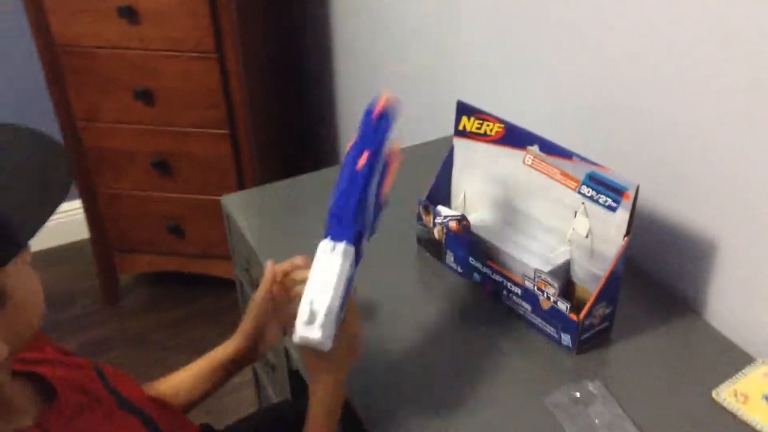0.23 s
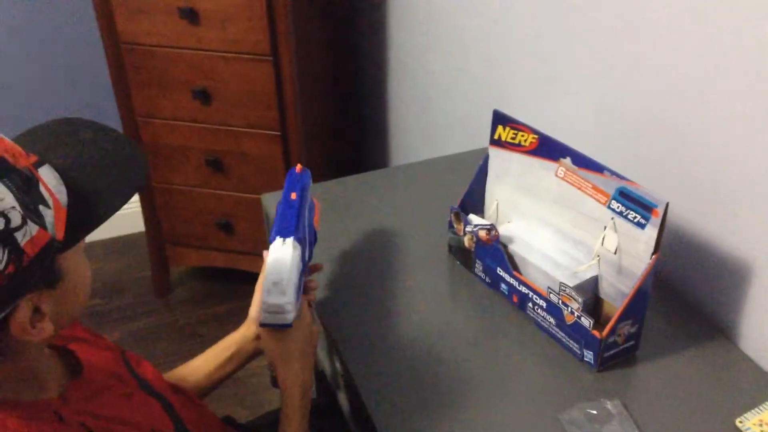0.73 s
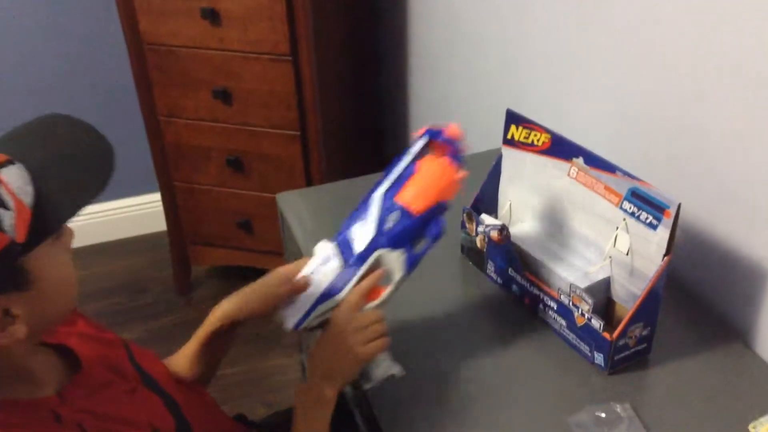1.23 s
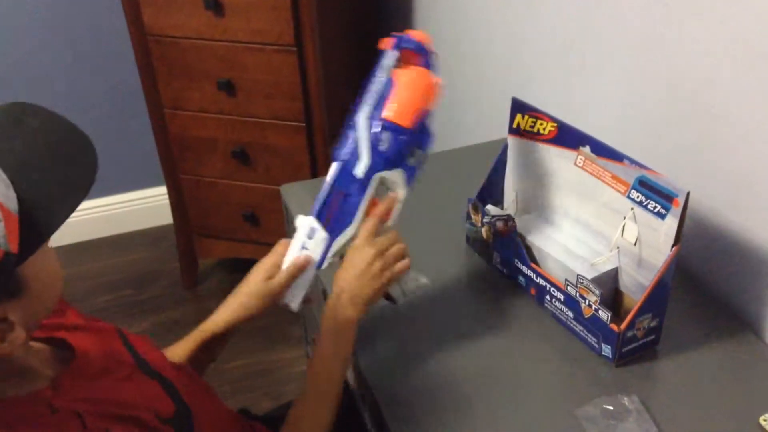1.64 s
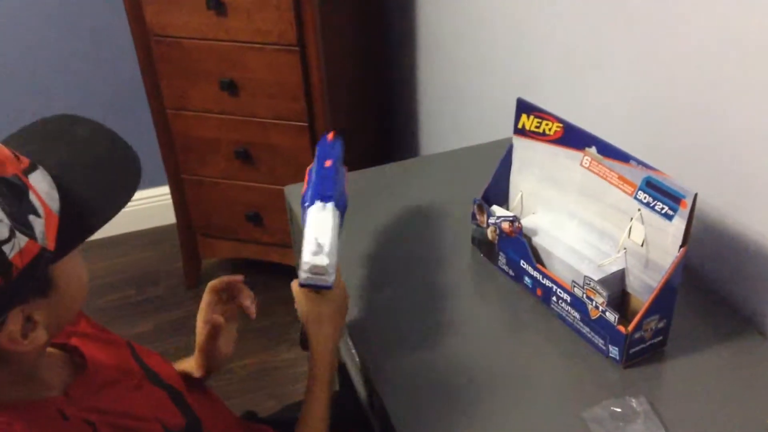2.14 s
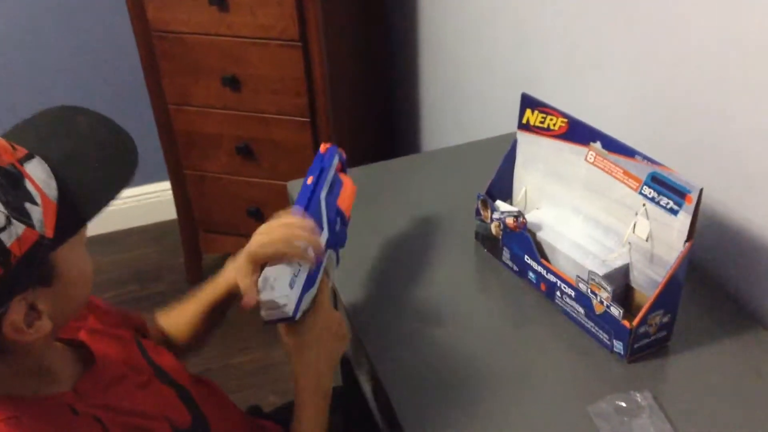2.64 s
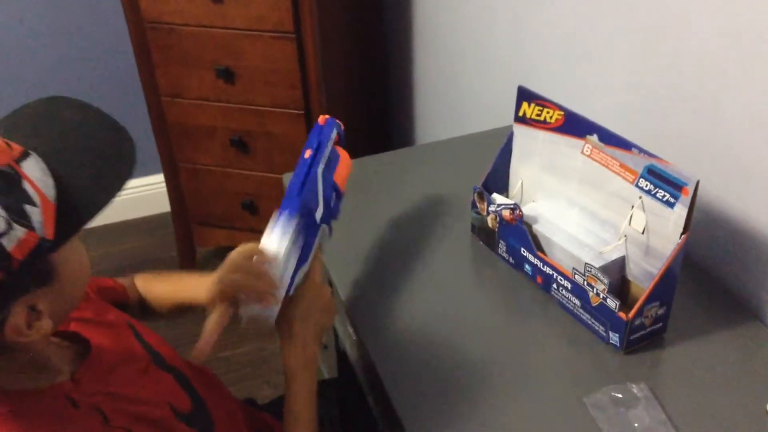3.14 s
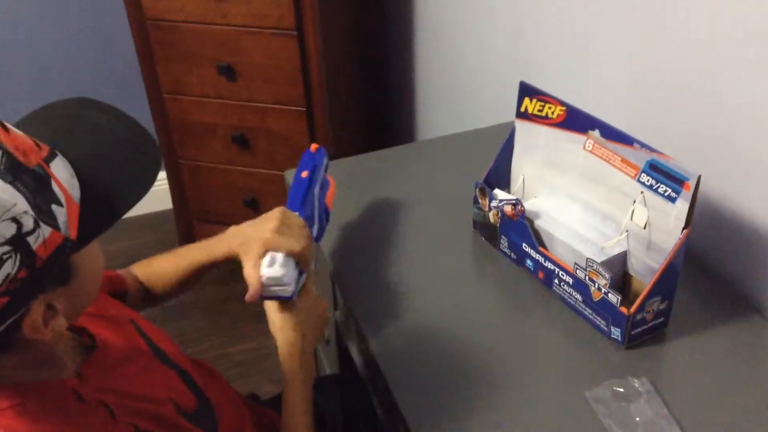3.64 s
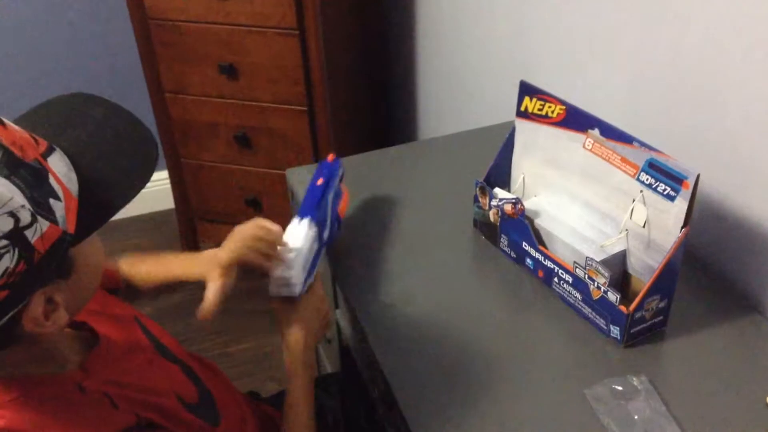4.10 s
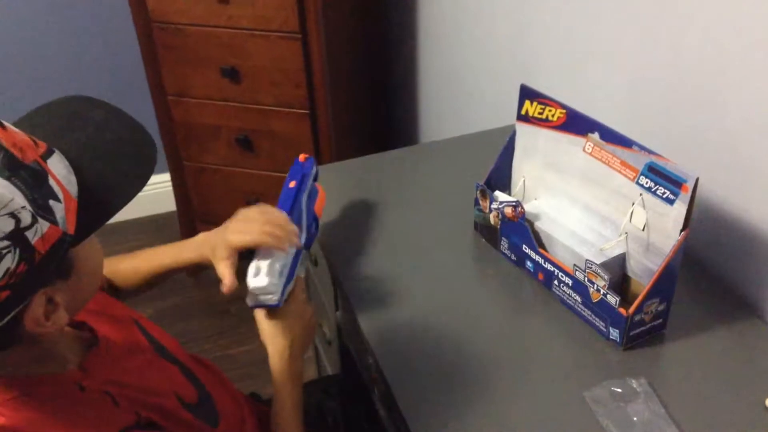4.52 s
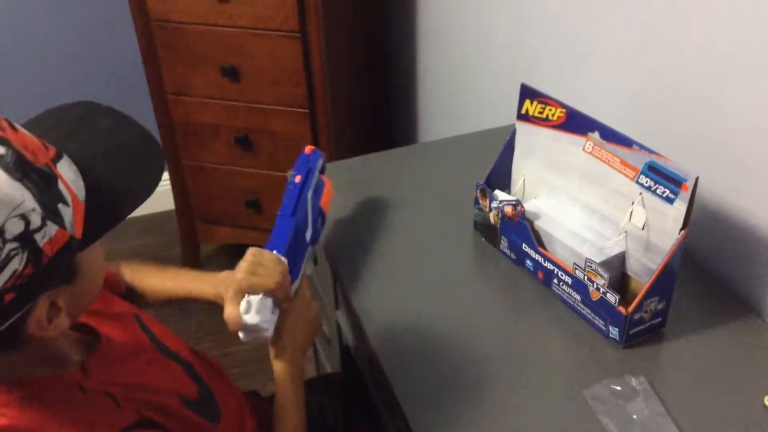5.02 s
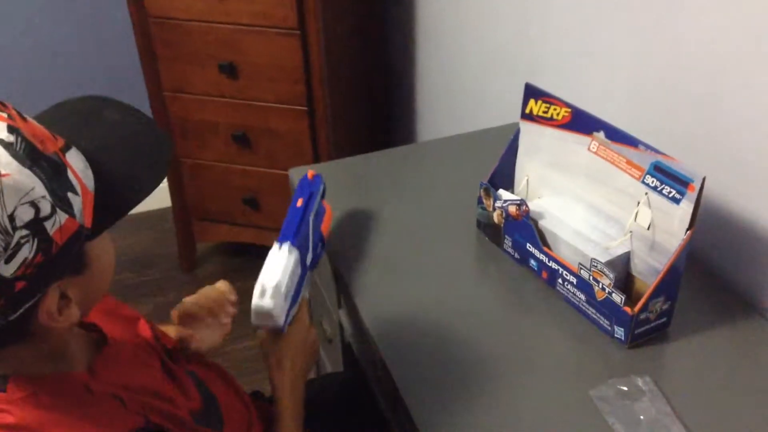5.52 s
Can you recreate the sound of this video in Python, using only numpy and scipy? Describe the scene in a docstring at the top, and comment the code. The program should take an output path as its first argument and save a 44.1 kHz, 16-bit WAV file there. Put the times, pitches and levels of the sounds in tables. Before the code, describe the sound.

A hollow plastic toy dart blaster is worked close to the microphone in a small, hard-walled room with a short echo and faint hum. It opens with quick clicks and the slide slamming home at 0.2 seconds. The first shot pops at 0.6, the dart smacking a farther surface an instant later. The slide scrapes back and latches at 1.5, slams forward at 1.8, and a second shot comes at 2.2, its dart bouncing lightly. The cycle then quickens: latch at 2.9, slam at 3.2, shot at 3.4; latch at 3.8, slam at 4.1, shot at 4.3 with a clattering dart. A loud latch and knock at 4.9 and a slam at 5.2 lead to the last shot at 5.4, followed by a sharp click. Throughout, small parts click and rattle, and hands softly brush and knock the shell.

```python
"""Toy dart blaster in a room

A spring-powered blaster is primed and fired five times in a small, hard-walled room. Its slide scrapes
back, latches and slams home; the freed plunger strikes with a pop, the spring shudders, and the dart
smacks a far surface. Hands brush, knock and rattle the hollow plastic shell. Each impact is a brief
noisy force filtered by resonances, and the room prolongs it with reflections and standing waves."""
import sys
import numpy as np
from scipy import signal
from scipy.fft import rfft, irfft
from scipy.io import wavfile
from scipy.ndimage import uniform_filter1d

SR = 44100
rng = np.random.default_rng(int(sys.argv[2]) if len(sys.argv) > 2 else 0)


def file_out(sig):
    """Save sig as 16-bit WAV at sys.argv[1]."""
    # one column per channel
    cols = np.atleast_2d(sig).T
    # limit, then scale
    lim = np.clip(cols, -1, 1)
    pcm = np.round(lim * 32767).astype(np.int16)
    wavfile.write(sys.argv[1], SR, pcm)


N = 254016

# Levels are relative within each table. Hardness is a treble lift; ring is the note of the part struck.
# spectrum of the room air: (frequency [Hz], level [dB])
AIR_SPECTRUM = [(50, -49), (110, -1.5), (180, -23), (240, -4.5), (330, -13.5), (480, -10), (800, -11.5),
                (2000, -18), (5700, -26.5), (9000, -30.5), (15000, -37)]
# steady tones in the room: (frequency [Hz], level [dB])
HUM_TONES = [(242.2, -62.5), (543.7, -67)]
# reverberation time: (frequency [Hz], time to fall 60 dB [s])
ROOM_T60 = [(100, 0.24), (170, 0.3), (400, 0.41), (1040, 0.43), (2760, .47), (7000, 0.4), (10000, 0.35),
            (14500, 0.29)]
# standing waves of the room: (frequency [Hz], level [dB])
STANDING_WAVES = [(147, -50.5), (265, -44), (343, -31), (368, -53), (503, -44.5), (590, -50), (661, -50),
                  (811, -26), (921, -31), (979, -40), (1022, -51), (1245, -55), (1372, -66), (1452, -41),
                  (1656, -48)]
# echoes from wall and ceiling: (delay [s], added strength [ratio])
WALL_ECHOES = [(.0095, 0.073), (0.0232, 0.21)]
# resonances of the hollow shell: (frequency [Hz], bandwidth [Hz], level [dB])
SHELL_MODES = [(466, 147, -0.5), (680, 130, -8.5), (1039.5, 30, -8.5), (1236, 24, -12), (2203, 320, -10.5),
               (3750, 47, -21), (4460, 510, -18), (6230, 240, -10)]
# spectral envelope of each kind of contact: (frequency [Hz], level [dB])
PALM_SPECTRUM = [(300, -30), (1500, -12), (3500, 1), (6200, 4), (10000, -5), (15500, -6)]
RUB_SPECTRUM = [(88, -52), (150, -25), (422, -13), (624, -3), (821, -3), (1080, 1.5), (1360, -3),
                (2060, -4), (10200, -14.5), (14800, -24), (16000, -44)]
KNOCK_SPECTRUM = [(53, -40), (90, -17), (633, -13), (1510, -14.5), (2000, -20), (3010, -17), (8170, -20.5),
                  (13700, -28), (15000, -42), (16000, -44)]
CLICK_SPECTRUM = [(71, -71), (120, -21.5), (209, -24), (231, -11), (295, -35.5), (473, -15), (670, -4.5),
                  (856, -12), (1050, -5), (1340, -6), (3520, -11.5), (4680, -10), (13600, -17),
                  (15000, -18.5), (16000, -41)]
SLAM_SPECTRUM = [(71, -33), (120, -32), (177, -19.5), (295, -1.5), (393, 0.5), (727, 0.5), (805, -6.5),
                 (1010, 4), (1650, -5), (2150, -3), (3590, -10), (9790, -12), (13900, -15), (15000, -11),
                 (16000, -44)]
DART_SPECTRUM = [(53, -14), (90, -21.5), (249, 8), (410, -5.5), (647, 0.5), (1040, 0.5), (1240, 3),
                 (2710, -7.5), (9310, -18), (15000, -24), (16000, -9.5)]
PLUNGER_SPECTRUM = [(80, -23.5), (125, 7.5), (180, 10.5), (300, 5), (420, -1), (620, 7.5), (880, -0.5),
                    (1350, 6), (2100, 2), (3100, 0.5), (4700, 0), (10000, -1), (15500, -4.5)]
# a palm brushing smooth plastic: (start [s], end [s], level [dB])
PALM_STROKES = [(0.33, 0.46, -52.5), (1.124, 1.173, -62), (1.367, 1.458, -48), (2.483, 2.63, -59),
                (3.63, 3.733, -52.5), (4.27, 4.34, -63), (4.638, 4.718, -54)]
# slide drawn back: (start [s], latch time [s], rubbing level [dB], latch level [dB], hardness [dB])
SLIDE_PULLS = [(1.39, 1.54, -34.5, 2, 9.5), (2.771, 2.945, -27, 5.5, 14), (3.71, 3.844, -25, 0.5, 9),
               (4.727, 4.869, -31, 0, 10)]
# slide running home: (slam time [s], rubbing level [dB], slam level [dB], hardness [dB], ring [Hz])
SLIDE_RETURNS = [(0.166, -22, -3.5, -0.5, 501), (1.822, -19, -3.5, 2, 545), (3.199, -28, -1, 3, 409),
                 (4.097, -24.5, -1.5, 1, 552), (5.171, -22.5, -0.5, 1.5, 538)]
# impacts, by the part that strikes: (time [s], level [dB], hardness [dB], ring [Hz])
HAND_KNOCKS = [(1.073, -22.5, -11.5, 665), (1.154, -13.5, -14.5, 410), (2.708, -29.5, -24, 530),
               (4.548, -16, -8, 278), (4.609, -26, -1, 264), (4.892, -8.5, 0, 496), (5.705, -29, -14, 513)]
MECHANISM_CLICKS = [(0.002, -15.5, -6.5, 1710), (0.022, -24, 0, 1810), (0.152, -12.5, -1, 1090),
                    (0.257, -9.5, -3, 670), (0.548, -26.5, -5.5, 720), (0.844, -23, 13, 786),
                    (1.101, -25, -9, 953), (1.206, -19.5, -2, 2650), (1.315, -23, -12, 2310),
                    (1.371, -23, -4, 2100), (1.426, -16, -3, 680), (1.467, -4, 5, 2530),
                    (1.513, -9, 1, 1440), (1.665, -8.5, 3.5, 1850), (1.803, -6.5, -2, 1250),
                    (1.901, -8, -7, 678), (2.754, -18, -10, 815), (2.774, -7.5, 16.5, 3420),
                    (2.858, -13.5, 0, 730), (2.931, -11.5, -6, 580), (3.076, -9.5, 1, 1570),
                    (3.132, -16, -1, 1000), (3.717, -6, 4, 1080), (3.808, -3, 4.5, 1130),
                    (3.986, -10, -1, 1550), (4.466, -5, 14, 1220), (4.71, -12.5, 5, 760),
                    (4.799, -14, -2.5, 680), (4.886, 2.5, -3.5, 670), (5.046, -10, 0, 1490),
                    (5.457, 4, -3, 1380)]
ROD_CLACKS = [(0.078, -15, -10, 1900), (0.121, -10, 0, 1410), (0.133, -11, 1, 1350), (1.756, -3.5, 3, 1580),
              (1.778, -4.5, 12, 1240)]
DART_IMPACTS = [(0.658, 4, 7, 484), (2.29, 2.5, 3, 640), (2.4, -17.5, -10, 1240), (2.503, -18, 4, 1230),
                (3.456, 5.5, 4, 540), (4.389, 0, -4, 520), (4.403, 2.5, 8, 1240), (4.479, -4, 13, 1190),
                (5.445, -1.5, -10, 1320)]
PLUNGER_STRIKES = [(0.606, 1.5, 1, 645), (2.239, 2, -1.5, 520), (3.407, 1.5, 0, 684), (4.34, 1, 1, 566),
                   (5.383, 2.5, -0.5, 1440)]

TAPS = 8192
HZ = np.fft.rfftfreq(TAPS, 1 / SR)  # frequency grid of the filters


def gain_of(db):
    """Amplitude ratio: a factor of ten for every 20 dB."""
    return 10 ** (np.asarray(db) / 20)


def unit_rms(x):
    """Normalisation to unit mean power."""
    return x / np.sqrt(np.mean(x ** 2) + 1e-20)


def curve_at(points, hz):
    """Interpolation of a (frequency, value) table on a logarithmic frequency axis."""
    f, value = np.transpose(points)
    return np.interp(np.log(hz + 1), np.log(f + 1), value)


def add(mix, s, sound):
    """Superposition: a sound adds to the mix from time s onward."""
    part = mix[max(round(s * SR), 0):][:len(sound)]
    part += sound[:len(part)]


def coloured(x, db):
    """Causality: a minimum-phase filter, shaped by db over HZ, rings only after it is struck."""
    log_gain = np.log(gain_of(np.maximum(db - db.max(), -100)))
    mirrored = np.concatenate([log_gain, log_gain[-2:0:-1]])
    response = irfft(np.exp(np.conj(signal.hilbert(mirrored)))[:len(HZ)])
    return signal.fftconvolve(x, response[:TAPS // 2])


def placed(sound, direct_db, room_db):
    """Two-path propagation: one row travels straight, the other feeds the room."""
    return sound * gain_of([[direct_db], [room_db]])


def background(air_db, hum_db):
    """Stationary noise: the continuous spectrum of room air plus the line spectrum of a low hum."""
    t = np.arange(N) / SR
    air = unit_rms(coloured(rng.standard_normal(N), curve_at(AIR_SPECTRUM, HZ))[:N])
    hum = sum(gain_of(db) * np.sqrt(2) * np.sin(2 * np.pi * (hz * t + rng.random()))
              for hz, db in HUM_TONES)
    return gain_of(air_db) * air + gain_of(hum_db) * hum


def room_response(gap_s=0.0012, build_s=0.0066, modes_db=-19.5, early_lift=0.32, early_s=0.0081):
    """Reverberation: reflections thicken and decay band by band; standing waves ring among them."""
    t = np.arange(SR) / SR
    density = np.minimum(1500 + 120000 * t, 9000)  # reflections per second
    arrivals = rng.standard_normal(SR) * (rng.random(SR) < density / SR) / np.sqrt(density)
    band_hz, frame_s, bands = signal.stft(arrivals, SR, nperseg=256)
    decay = gain_of(-60 * frame_s / curve_at(ROOM_T60, band_hz)[:, None])
    tail = signal.istft(bands * decay, SR, nperseg=256)[1][:SR]
    waves = sum(gain_of(db - 60 * t / curve_at(ROOM_T60, hz))
                * np.sin(2 * np.pi * (hz * t + rng.random())) for hz, db in STANDING_WAVES)
    onset = np.clip((t - gap_s) / build_s, 0, 1)
    early = 1 + early_lift * np.exp(-t / early_s)  # table and wall are close
    early += sum(strength * np.exp(-((t - delay) / 0.0007) ** 2) for delay, strength in WALL_ECHOES)
    return (unit_rms(tail * onset * early) + gain_of(modes_db) * unit_rms(waves * onset)) / np.sqrt(SR)


def reflections(x, level_db):
    """Convolution with a room response that shifts each second as the blaster is moved about."""
    t, out = np.arange(N) / SR, np.zeros(N)
    for second in range(7):
        crossfade = np.cos(np.pi / 2 * np.clip(t - second, -1, 1))
        out += signal.oaconvolve(x * crossfade, room_response())[:N]
    return gain_of(level_db) * out


def palm_hiss():
    """Friction noise: skin hisses softly on plastic as the hand shifts its grip."""
    out = np.zeros(N)
    for start, end, db in PALM_STROKES:
        pressure = signal.windows.tukey(max(round((end - start) * SR), 2), .6)
        hiss = coloured(rng.standard_normal(len(pressure)), curve_at(PALM_SPECTRUM, HZ))
        add(out, start, gain_of(db) * pressure * unit_rms(hiss[:len(pressure)]))
    return placed(out, direct_db=0.5, room_db=-10)


def shell_db(spread_db=0):
    """Modal response: the place struck decides how strongly each shell resonance is excited."""
    strengths = gain_of(spread_db * rng.uniform(-1.96, 1.98, len(SHELL_MODES)))
    lift = sum(strength * gain_of(db) / (1 + (2 * (HZ - hz) / width) ** 2)
               for strength, (hz, width, db) in zip(strengths, SHELL_MODES))
    return 20 * np.log10(1 + lift)


def slide_rubbing(level_db=-5, grain_db=4, catches_per_s=700):
    """Sliding friction: tiny random catches excite the shell, louder as the slide moves faster."""
    attack_s, sag_db_per_s = 0.039, 90  # the pull slows as the spring tightens
    return_s, swell_db_per_s = 0.158, 156  # the spring speeds the slide forward
    envelope = np.zeros(N)
    for start, latch, db, *_ in SLIDE_PULLS:
        t = np.arange(0, latch - start, 1 / SR)
        sag_db = sag_db_per_s * np.maximum(t - attack_s, 0)
        add(envelope, start, np.minimum(t / attack_s, 1) * gain_of(db - sag_db))
    remaining_s = np.arange(return_s, 0, -1 / SR)
    for slam, db, *_ in SLIDE_RETURNS:
        add(envelope, slam - return_s, gain_of(db - swell_db_per_s * remaining_s))
    sizes = gain_of(grain_db * np.minimum(rng.exponential(1, N), 3))
    catches = sizes * (rng.random(N) < catches_per_s / SR) * rng.choice([-1, 1], N)
    grit = coloured(catches, curve_at(RUB_SPECTRUM, HZ) + shell_db())[:N]
    rubbing = gain_of(level_db) * uniform_filter1d(envelope, size=400) * unit_rms(grit)
    return placed(rubbing, direct_db=-6.5, room_db=-1.5)


def chatter(envelope, grain_db):
    """Rough contact: plastic faces meet in many tiny impacts of uneven size."""
    size_db = grain_db * np.minimum(rng.exponential(1, len(envelope)), 4)
    return envelope * unit_rms(rng.standard_normal(len(envelope)) * gain_of(size_db))


def contact_db(hard_db, ring_hz, ring_db, ring_width, thin_db):
    """Impact spectrum: harder is brighter, smaller is thinner, and the part struck adds its note."""
    upper_mid_db = 0.46 * hard_db + .5 * thin_db
    slopes = curve_at([(330, -thin_db), (850, 0), (2600, upper_mid_db), (6500, hard_db)], HZ)
    return slopes + ring_db / (1 + ((HZ - ring_hz) / (ring_width * ring_hz)) ** 2)


def impacts(rows, spectrum, level_db, offset_s, rise_s, hold_s, fade_s,
            ring_db, ring_width, thin_db_per_octave, shudder_db, shudder_s, grain_db):
    """Source and filter: chatter, then a fainter shudder, rings the shell. Returns (direct, to room)."""
    t, out = np.arange(TAPS) / SR, np.zeros((2, N))
    median_hz = np.median([row[-1] for row in rows])
    beaming = HZ ** 2 / (HZ ** 2 + 2500 ** 2)
    body_db = curve_at(spectrum, HZ)
    strike = np.exp(-np.maximum(t - rise_s - hold_s, 0) / fade_s)
    shudder = gain_of(shudder_db) * np.exp(-t / shudder_s)
    envelope = np.minimum(t / rise_s, 1) * np.hypot(strike, shudder)
    for s, db, hard_db, ring_hz in rows:
        force = chatter(envelope, grain_db)
        thin_db = thin_db_per_octave * np.log2(ring_hz / median_hz)
        voice_db = body_db + shell_db(spread_db=3.5)
        voice_db += contact_db(hard_db, ring_hz, ring_db, ring_width, thin_db)
        # one direction hears chance peaks and dips in the treble; over all directions they partly cancel
        lobes_db = 10 * np.log10(abs(uniform_filter1d(abs(rfft(force)) ** 2, size=13)) + 1e-12)
        chance_db = (lobes_db - lobes_db.mean()) * beaming
        diffuse = coloured(force, voice_db - lobes_db + 0.47 * chance_db)
        direct = coloured(force, voice_db - lobes_db + chance_db)
        peak_rms = np.sqrt(uniform_filter1d(unit_rms(diffuse) ** 2, size=220).max())
        for path, sound in zip(out, (direct, diffuse)):
            add(path, s + offset_s, gain_of(db + level_db) * unit_rms(sound) / peak_rms)
    return out


def hand_knocks():
    """Soft impact: hands knock dully on the hollow shell."""
    sound = impacts(HAND_KNOCKS, KNOCK_SPECTRUM, level_db=-14, offset_s=0.0004,
                    rise_s=0.0027, hold_s=0.0025, fade_s=0.012, ring_db=8, ring_width=0.21,
                    thin_db_per_octave=11, shudder_db=-23, shudder_s=0.017, grain_db=2.5)
    return placed(sound, direct_db=-2, room_db=-0.5)


def mechanism_clicks():
    """Light impact: ratchet, trigger and loose parts click, each with its own note. The first row is the end of
    a slide scrape already under way as the scene opens, and the loud row at 4.886 s is a hand knocking the
    shell."""
    sound = impacts(MECHANISM_CLICKS, CLICK_SPECTRUM, level_db=-16, offset_s=0.0006,
                    rise_s=0.0015, hold_s=0.0051, fade_s=0.0065, ring_db=6.5, ring_width=0.15,
                    thin_db_per_octave=5.5, shudder_db=-37, shudder_s=0.024, grain_db=1)
    return placed(sound, direct_db=-2, room_db=-0.5)


def rod_clacks():
    """Resonance: the plunger rod clacks in its hollow tube as the slide starts to move."""
    sound = impacts(ROD_CLACKS, CLICK_SPECTRUM, level_db=-16, offset_s=0.0006,
                    rise_s=0.0015, hold_s=0.0014, fade_s=0.0026, ring_db=25.5, ring_width=0.31,
                    thin_db_per_octave=11, shudder_db=-36, shudder_s=0.02, grain_db=1)
    return placed(sound, direct_db=-3, room_db=-6)


def latches(catch_hz=985):
    """Natural frequency: the catch rings at the same note at the end of every pull."""
    rows = [(s, db, hard_db, catch_hz) for _, s, _, db, hard_db in SLIDE_PULLS]
    sound = impacts(rows, CLICK_SPECTRUM, level_db=-16.5, offset_s=0.00065,
                    rise_s=0.0025, hold_s=0.0035, fade_s=0.004, ring_db=15.5, ring_width=0.19,
                    thin_db_per_octave=0, shudder_db=-38, shudder_s=0.022, grain_db=1)
    return placed(sound, direct_db=-1, room_db=0)


def slide_slams():
    """Sudden deceleration: the slide slams home and shakes the loose parts."""
    rows = [(s, *blow) for s, _, *blow in SLIDE_RETURNS]
    sound = impacts(rows, SLAM_SPECTRUM, level_db=-6, offset_s=0.000722,
                    rise_s=0.0032, hold_s=0.001, fade_s=0.0054, ring_db=2.5, ring_width=0.14,
                    thin_db_per_octave=-3, shudder_db=-26, shudder_s=0.045, grain_db=3.5)
    return placed(sound, direct_db=-2, room_db=1.5)


def shell_thuds(level_db=-6.5, rise_s=0.0025, fade_s=0.0059, overtone_ratio=2.7, overtone_db=-15):
    """Damped flexure: each slam bends the back of the shell, sending a hollow note to the microphone."""
    t, out = np.arange(TAPS) / SR, np.zeros(N)
    envelope = (1 - np.exp(-t / rise_s)) * np.exp(-t / fade_s)
    for s, _, db, _, hz in SLIDE_RETURNS:
        phases = 2 * np.pi * rng.random(2)
        note = np.sin(2 * np.pi * hz * t + phases[0])
        note += gain_of(overtone_db) * np.sin(2 * np.pi * hz * overtone_ratio * t + phases[1])
        add(out, s, gain_of(db + level_db) * envelope * note)
    return placed(out, direct_db=-1, room_db=-8)


def dart_smacks():
    """Distant impact: darts land and bounce across the room, so their direct sound is weak."""
    sound = impacts(DART_IMPACTS, DART_SPECTRUM, level_db=-9.5, offset_s=0.0005,
                    rise_s=0.0042, hold_s=0.0007, fade_s=0.0079, ring_db=6.5, ring_width=0.071,
                    thin_db_per_octave=-1, shudder_db=-27, shudder_s=0.073, grain_db=2.5)
    return placed(sound, direct_db=-7.5, room_db=-4.5)


def plunger_pops():
    """Release of elastic energy: the freed plunger strikes with a pop and the spring shudders."""
    sound = impacts(PLUNGER_STRIKES, PLUNGER_SPECTRUM, level_db=-7.5, offset_s=-0.0016,
                    rise_s=0.0047, hold_s=0.0036, fade_s=0.0016, ring_db=1.5, ring_width=0.14,
                    thin_db_per_octave=-0.5, shudder_db=-27.5, shudder_s=0.037, grain_db=4)
    return placed(sound, direct_db=-2.5, room_db=3)


def scene():
    """Superposition: direct sound, reverberant field and background add at one microphone."""
    shots = plunger_pops() + dart_smacks()
    mechanism = slide_slams() + latches() + mechanism_clicks() + rod_clacks()
    shell = hand_knocks() + shell_thuds() + slide_rubbing() + palm_hiss()
    direct, diffuse = shots + mechanism + shell
    return (direct + reflections(diffuse, level_db=-3.5) + background(air_db=-54, hum_db=2))[None]


def record(dry):
    """Band limiting and saturation: the microphone sheds deep bass and top treble and rounds peaks."""
    low_hz, high_hz, ceiling = 136, 15530, 0.9
    high_pass = signal.butter(N=12, Wn=low_hz, btype="high", fs=SR, output="sos")
    low_pass = signal.firwin(511, high_hz, window=("kaiser", 9), fs=SR)
    thin = signal.sosfilt(high_pass, dry)
    rounded = thin / (1 + (thin / ceiling) ** 6) ** (1 / 6)
    return signal.oaconvolve(rounded, low_pass[None], "same")


dry = scene()
out = record(dry)
file_out(out)
```